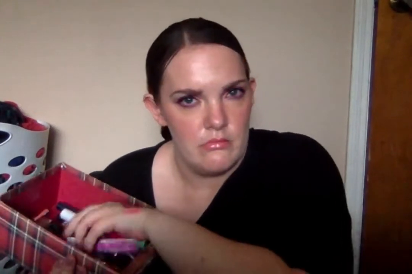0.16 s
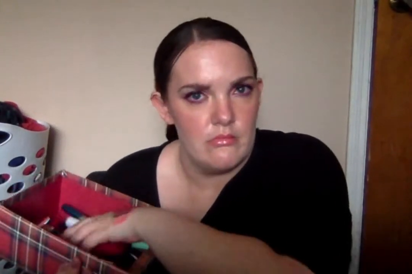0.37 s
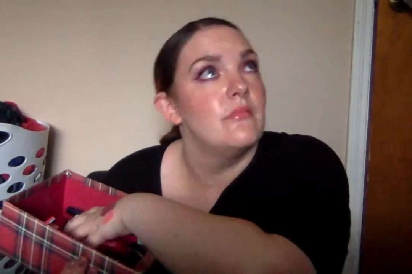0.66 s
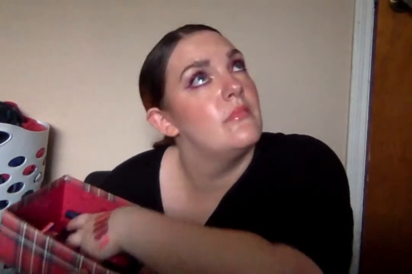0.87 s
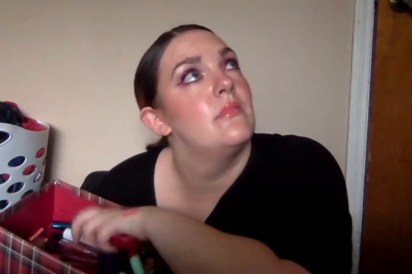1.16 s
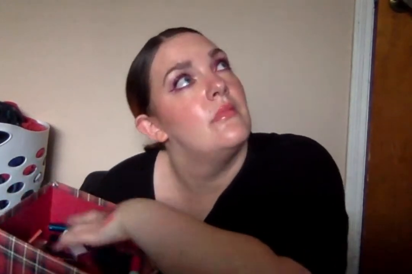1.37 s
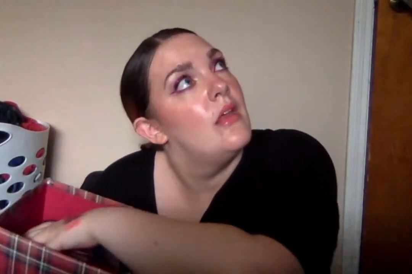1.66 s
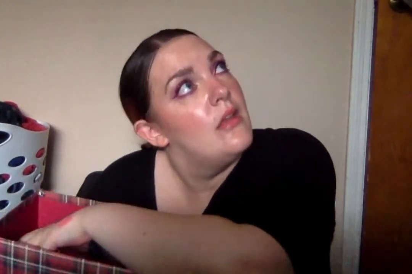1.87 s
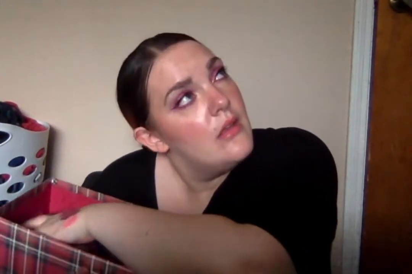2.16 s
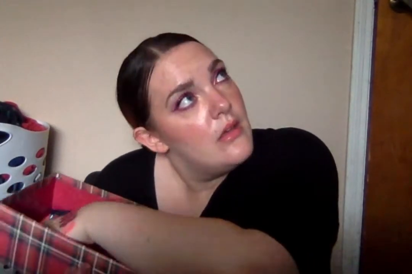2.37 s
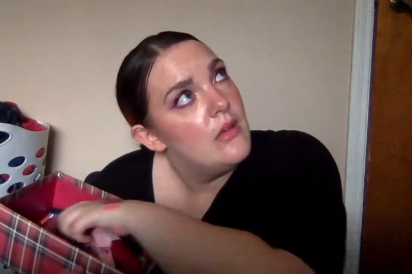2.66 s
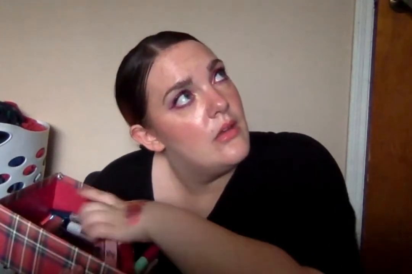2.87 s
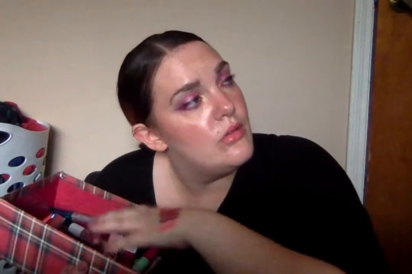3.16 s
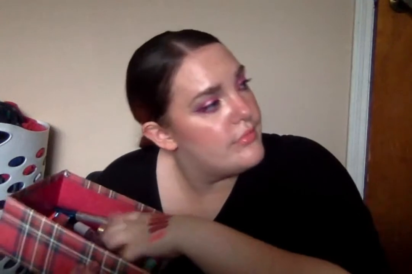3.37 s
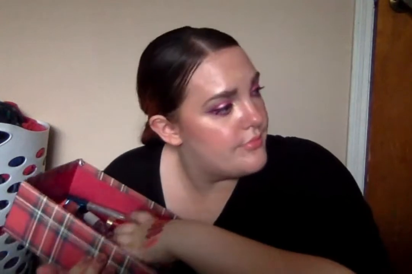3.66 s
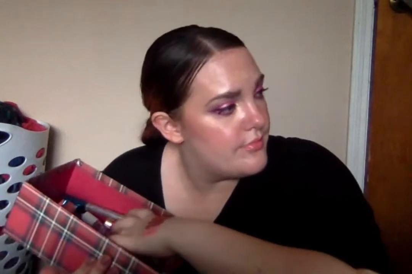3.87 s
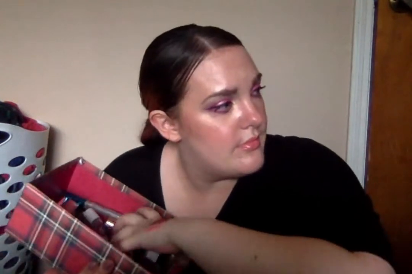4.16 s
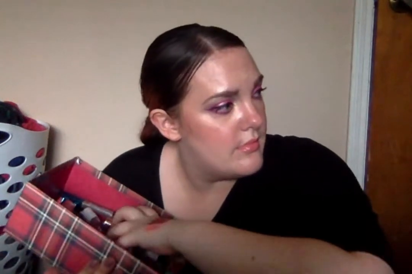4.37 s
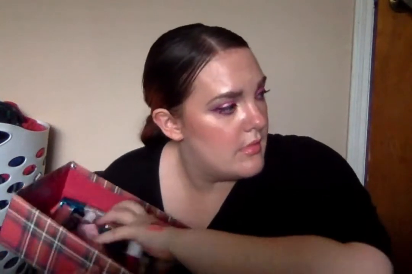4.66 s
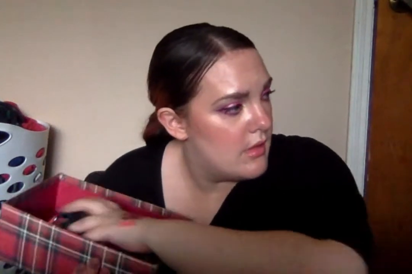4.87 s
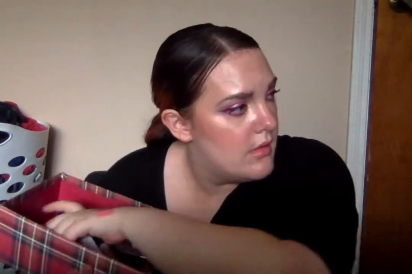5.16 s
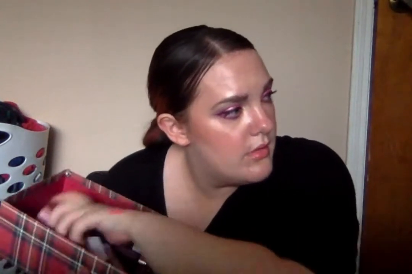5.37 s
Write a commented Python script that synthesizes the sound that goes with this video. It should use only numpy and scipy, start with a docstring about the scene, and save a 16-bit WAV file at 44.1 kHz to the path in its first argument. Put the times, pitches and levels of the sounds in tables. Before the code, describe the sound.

Plastic lipstick tubes click, knock and rattle as a hand rummages through a cardboard box in a small room.

```python
"""A hand rummages through plastic lipstick tubes in a cardboard box, in a small bare room.
From the start tubes knock on the box and click together, sliding and rattling between the blows.
A louder flurry after one second thins to light taps on hollow caps near two. The digging resumes,
the box bumping softly as it is shifted, eases just after four seconds and ends in a dense clatter.
The walls throw the clatter back, and a quiet hiss lies under it all."""
import sys
import numpy as np
from scipy import signal
from scipy.io import wavfile
from scipy.ndimage import uniform_filter1d

SR = 44100
rng = np.random.default_rng(int(sys.argv[2]) if len(sys.argv) > 2 else 0)


def wav_record(signal):
    """Record a signal, one row per channel, as 16-bit PCM in the file named by sys.argv[1]."""
    frames = np.transpose(np.atleast_2d(signal))
    bounded = np.clip(frames, -1, 1)
    # unit amplitude maps onto the largest positive 16-bit level
    quanta = np.round(bounded * 32767).astype(np.int16)
    wavfile.write(sys.argv[1], SR, quanta)


N = 243564

# a tube strikes the box: t/s, level/dB, then its tone: hollow thud/dB, woody knock/dB, hard clack/dB
KNOCKS = [(0.06, -33, -8, 5.5, 8), (0.07, -37, -15, -23, 16), (0.137, -37, -10, -17, 0.5),
          (0.174, -32.5, -13.5, -2, -16), (0.275, -36.5, -25, -30, -10), (0.295, -29.5, -16, -7, -11),
          (0.319, -26.5, -6, -1.5, 3.5), (0.485, -43.5, -52, 15.5, -2), (0.674, -37.5, -14.5, -2.5, -17),
          (0.797, -30, -6.5, 2, -5), (0.824, -29, -19.5, -8, 6), (1.05, -20.5, -10.5, -8, -5),
          (1.116, -17, -27, -10.5, -6.5), (1.129, -26.5, 1, 4, -21), (1.166, -19.5, -12, -10.5, -6),
          (1.237, -26.5, -41, -29, -14), (1.267, -30, -19, -29, -11), (1.326, -29.5, -11.5, -8, -12),
          (1.413, -22.5, -18, -8, -12.5), (1.426, -26, -5, -18, -7.5), (1.508, -30, -38, -16, -27),
          (1.54, -29, -20, -21, -30), (1.562, -31, -30, -10, -24), (1.628, -48, -38.5, -22, -28),
          (2.116, -37.5, -23, -31.5, -44), (2.184, -24.5, -21, -56, -5), (2.241, -27, -30, -37, -9.5),
          (2.305, -26, -14, -8, -13), (2.323, -40, -25.5, -32, 4), (2.48, -19.5, -16.5, -3.5, -15),
          (2.588, -18.5, -20, -11.5, -15), (2.615, -27, -36, -20, -28), (2.766, -26, -54, -33, -14),
          (2.774, -20, -6.5, -17, -13.5), (2.881, -31, -22, -19, -8), (2.94, -28.5, -7, -15, -8),
          (3.021, -18, -18.5, -11, -12.5), (3.07, -29.5, -11.5, -6, -1.5), (3.245, -62, -44, -16, -17),
          (3.356, -40, -17.5, -28, -24), (3.437, -18.5, -27.5, -7, -12), (3.61, -40, -35, -6, -18),
          (3.685, -34.5, -28, -15, -45), (3.733, -28, -46, -7, -11.5), (3.802, -26, -15.5, -13, -12.5),
          (3.901, -28.5, -32, -7, -23), (3.983, -30.5, -36, 5, -10.5), (4.039, -33, -17.5, 4, -7.5),
          (4.228, -49.5, -23, -12, -14), (4.26, -52.5, -9, 5, -1.5), (4.518, -39.5, -24, -12, -56),
          (4.661, -33.5, -11, 2.5, 1), (4.761, -30, -12.5, 1, -31), (4.815, -22, -23, -10, -8),
          (4.857, -19, -16.5, -10, -10.5), (4.951, -22, -13, -7, -1.5), (4.99, -19.5, -16, 3, -13),
          (5.001, -27, -18, 9, 9), (5.032, -19, -16.5, -16, -28), (5.181, -32, -23, -18, -39),
          (5.202, -30, -42, -20, -30), (5.232, -28, -38, -1, -28), (5.401, -18.5, -14, -6, -14.5),
          (5.434, -27, -8.5, -7, -42), (5.457, -17, -8.5, -11, -11), (5.515, -24.5, -11, -10, -4)]
# tube meets tube: t/s, level/dB, ring f/Hz, bright snap/dB (relative to the level)
CLICKS = [(0.06, -41, 3600, -35), (0.0683, -33, 3270, -21.5), (0.295, -39, 2900, -35),
          (0.3184, -29.5, 2540, -24.5), (0.327, -33, 3250, -22), (0.3867, -36, 3100, -15),
          (0.524, -55, 8200, -20), (0.566, -40.5, 4140, -21), (0.572, -71, 4580, -13),
          (0.6587, -49.5, 3130, -17), (0.666, -48, 5560, -25), (0.8113, -35.5, 4240, -15),
          (0.821, -28, 4380, -15), (0.9234, -35.5, 6580, -17), (0.9802, -31, 3870, -15),
          (0.99, -34.5, 3370, -22), (1.053, -33.5, 2670, -16), (1.1184, -41, 3000, -34),
          (1.1691, -27, 2520, -17), (1.265, -35, 3550, -27), (1.3652, -33, 3680, -51.5),
          (1.4142, -39.5, 3100, -28), (1.465, -40, 5900, -23), (1.69, -59, 3520, -18),
          (2.134, -55, 3600, -49), (2.184, -35.5, 4380, -16.5), (2.3017, -42.5, 3080, -47),
          (2.346, -46.5, 2800, -14), (2.4435, -37.5, 4070, -30), (2.4882, -36.5, 2580, -11.5),
          (2.584, -46, 3070, -41), (2.663, -35, 4170, -58), (2.7834, -39, 3940, -25),
          (2.7974, -38.5, 6730, -12), (2.8503, -43.5, 4000, -37), (2.927, -37.5, 3020, -25),
          (2.972, -35, 4400, -24), (3.058, -39.5, 4300, -16), (3.073, -36, 3000, -16),
          (3.4005, -41.5, 4100, -38), (3.4363, -37, 3880, -13), (3.5835, -45, 3170, -12.5),
          (3.7298, -32, 3270, -15), (3.7416, -32.5, 3960, -26), (3.983, -51, 6700, -25),
          (4.023, -55, 4400, -11), (4.318, -54, 3700, -29), (4.319, -58, 5400, -34),
          (4.4085, -58, 4000, -34), (4.416, -57.5, 2440, -40), (4.6022, -41, 4270, -26),
          (4.6656, -41, 4200, -22), (4.698, -33.5, 7400, -11), (4.7083, -28.5, 7400, -18),
          (4.802, -28.5, 3540, -18), (4.8553, -42, 2880, 2.5), (4.9516, -52, 2800, -13),
          (4.99, -32.5, 3600, -7), (4.998, -29.5, 2850, -9.5), (5.1415, -49, 3630, -38),
          (5.2626, -31, 2760, -22), (5.2689, -38, 4700, -44), (5.456, -38.5, 2800, -40),
          (5.4823, -40, 3350, -13.5)]
# the hand pushes through the tubes: t/s, length/s, sliding/dB, jostling/dB, scratching/dB
STROKES = [(0.0, 0.2, -34, -54, -71), (0.299, 0.11, -28.5, -39, -66), (0.438, 0.16, -44, -85, -96),
           (0.68, 0.046, -53.5, -76, -84), (0.764, 0.034, -43.5, -52, -77),
           (0.79, 0.061, -21.5, -38.5, -55), (0.846, 0.21, -46, -40, -59), (1.009, 0.28, -26, -41, -58.5),
           (1.199, 0.2, -29, -46.5, -76), (1.409, 0.048, -25, -46, -58), (1.494, 0.068, -43.5, -50, -66.5),
           (1.602, 0.17, -53, -63, -81), (1.903, 0.022, -55, -67, -96), (2, 0.075, -52, -68, -98),
           (2.132, .14, -29.5, -44.5, -91), (2.291, 0.083, -26.5, -47.5, -76), (2.4, 0.14, -34, -48.5, -86),
           (2.512, 0.1, -30.5, -71, -90), (2.675, 0.23, -37, -60, -84), (2.746, 0.1, -30, -41.5, -64),
           (2.855, 0.5, -35, -62, -81), (2.994, 0.092, -26.5, -40, -60), (3.095, .06, -37, -64, -90),
           (3.235, .045, -53, -72, -95), (3.359, 0.045, -36, -58, -85), (3.404, 0.082, -34.5, -43.5, -54),
           (3.52, 0.043, -42.5, -59, -71), (3.716, 0.068, -48, -60, -52.5), (3.769, 0.054, -33, -47.5, -71),
           (3.889, 0.032, -30, -56, -80), (4.004, 0.048, -30.5, -76, -88), (4.309, 0.035, -39, -79, -90),
           (4.503, 0.065, -64, -91, -99), (4.577, 0.088, -33.5, -52, -92), (4.65, 0.14, -26, -34, -49.5),
           (4.789, 0.11, -24, -36, -49), (4.89, 0.047, -32, -44.5, -62), (4.953, 0.12, -24.5, -37, -50.5),
           (5.104, 0.23, -35.5, -68, -76), (5.351, 0.082, -37, -71, -91), (5.478, .06, -28.5, -48, -68)]
STIR_ATTACK_S = 0.005  # rise of the skid, rattle or graze that follows a blow


def amp(db):
    """Decibels to gain."""
    return 10 ** (np.asarray(db) / 20)


def unit(x):
    """Scales to rms 1."""
    return x / np.sqrt(np.mean(x ** 2) + 1e-20)


def struck(x):
    """Scales a blow to rms 1 over its first 10 ms."""
    return x / np.sqrt(np.mean(x[:SR // 100] ** 2) + 1e-20)


def curve_at(points, hz):
    """Reads a curve on a log-frequency axis."""
    f, value = np.transpose(points)
    return np.interp(np.log(hz + 1), np.log(f + 1), value)


def add(mix, s, sound):
    """Mixes a sound in at time s."""
    part = mix[max(round(s * SR), 0):][:len(sound)]
    part += sound[:len(part)]


def band(x, lo_hz, hi_hz, order=3):
    """Causal band-pass."""
    return signal.sosfilt(signal.butter(order, [lo_hz, hi_hz], "band", fs=SR, output="sos"), x)


def colour(x, spectrum, size=2048):
    """Minimum-phase EQ from rows (f/Hz, level/dB), so attacks stay sharp."""
    log_gain = np.log(amp(curve_at(spectrum, abs(np.fft.fftfreq(size, 1 / SR)))))
    taps = np.fft.ifft(np.exp(np.conj(signal.hilbert(log_gain)))).real
    return signal.oaconvolve(x, taps)[:len(x)]


def swells(rows, attack_s, release_s, sag_db_per_s=0):
    """Envelope from rows (t/s, hold/s, level/dB): each rises, holds, and falls 60 dB in release_s."""
    power = np.zeros(N)
    for s, hold, db in rows:
        t = np.arange(0, hold + release_s, 1 / SR)
        fall_db = sag_db_per_s * t + 60 * np.maximum(t - hold, 0) / release_s
        add(power, s, (np.minimum(t / attack_s, 1) * amp(db - fall_db)) ** 2)
    return np.sqrt(power)


def pushes(levels_db):
    """Envelope of the hand's strokes: each push fades as the load gives way."""
    rows = [(s, length, db) for (s, length, *_), db in zip(STROKES, levels_db)]
    return swells(rows, attack_s=0.0059, release_s=0.041, sag_db_per_s=31.5)


def contacts(ring, spread_db, count):
    """A grain stream: sets a ring going at random moments, with uneven strength."""
    out = np.zeros(N)
    for when, strength, side in rng.random((count, 3)):
        add(out, when * N / SR, amp(spread_db * strength) * np.sign(side - .5) * ring)
    return out


def steadied(x, size=2000):
    """Takes the slow swell out of a texture and leaves its grain."""
    return x / np.sqrt(abs(uniform_filter1d(x ** 2, size)) + np.mean(x ** 2) / 20)


def dispersed(x, width_hz=170):
    """Bending waves in cardboard travel at different speeds, smearing a push over a few milliseconds."""
    radius = np.exp(-np.pi * width_hz / SR)
    for hz in (650, 950, 1300, 1750, 2300):
        poles = [1, -2 * radius * np.cos(2 * np.pi * hz / SR), radius * radius]
        x = signal.lfilter(poles[::-1], poles, x)  # all-pass
    return x


def box_ring(modes_db=0, crunch=0.98, crunch_s=0.0025, scatter_db=3.5, detune=0.028, size=3000):
    """One blow on the box: a sharp push, modes weighted by where it lands, and the loose load's jolt."""
    # modes of the box and its load: f/Hz, level/dB, t60/s
    modes = [(247, 9, 0.0092), (401, -8, 0.067), (436.5, 5.5, 0.015), (461, 8.5, 0.055), (606, -5, 0.071),
             (745.5, 8, 0.19), (795, -4.5, 0.17), (969, 2, 0.096), (1117, 0.5, 0.12), (1190, -4, 0.057),
             (1320, -4.5, 0.05), (1390, -10, 0.032), (1650, -1.5, 0.082), (1625, -6, 0.034),
             (1860, -15, 0.09), (1849, -8.5, 0.017), (2142, -3, 0.02), (2880, -11, 0.052)]
    t = np.arange(size) / SR
    hz, db, t60 = np.transpose(modes)[:, :, None]
    hz = hz * (1 + detune * rng.standard_normal(hz.shape))  # the shifting load retunes the box
    damping = np.log(1000) / t60
    weight = amp(db + modes_db + scatter_db * rng.standard_normal(hz.shape)) * 2 * damping / SR
    phase = rng.uniform(-1.6, 1, hz.shape)
    ring = (weight * np.exp(-damping * t) * np.cos(2 * np.pi * hz * t + phase)).sum(0)
    ring[0] += 1  # the push itself
    jolt = rng.standard_normal(size) * np.exp(-t / crunch_s)
    return ring + crunch * jolt / np.linalg.norm(jolt)


def plastic_partials(hz, size, decay_s):
    """One row per partial: a quick swell that dies within a few milliseconds."""
    t = np.arange(size) / SR
    rise = 1 - np.exp(-t / .0005)
    return np.sin(2 * np.pi * hz[:, None] * t) * rise * np.exp(-t / decay_s)


def tube_ring(hz, partial_db, crack_db, ring_s, crack_s=0.0032, size=1200):
    """A plastic tube: a crack, a well-damped main ring, and weaker partials set by the contact."""
    # tone of the crack: f/Hz, level/dB
    crack_eq = [(400, 4), (1500, 9), (2600, 14), (4500, 18), (6000, 5), (8000, -21.5), (11000, -9.5),
                (15000, -18)]
    t = np.arange(size) / SR
    side_hz = rng.uniform([2400, 3400, 5200, 6200], [3400, 5000, 6400, 8200])
    side_gains = amp(partial_db * rng.uniform(0.11, 1.72, len(side_hz)))
    ring = np.append(1, side_gains) @ plastic_partials(np.append(hz, side_hz), size, ring_s)
    crack = colour(rng.standard_normal(size) * np.exp(-t / crack_s), crack_eq)
    return struck(ring) + amp(crack_db) * struck(crack)


def scuffed(ring, scuff_db, lead_s, settle_db=-15, settle_s=0.0051, size=1500, count=40):
    """A tube grazes its neighbours as it lands, then rebounds. Returns the pre-roll (s) and the sound."""
    offsets = rng.integers(-size, size, count)
    grazes = amp(scuff_db) * np.exp(-abs(offsets) / SR / lead_s)
    rebounds = amp(settle_db) * np.exp(-abs(offsets) / SR / settle_s)
    touches = np.zeros(2 * size)
    touches[offsets + size] = np.where(offsets < 0, grazes, rebounds) * rng.standard_normal(count)
    touches[size] = 1  # the main hit
    return size / SR, signal.fftconvolve(touches, ring)


def room_tone(level_db=-70):
    """A quiet bed of hiss with a thin whine."""
    # tone of the bed, the whine a narrow peak at 11.6 kHz: f/Hz, level/dB
    hiss_eq = [(25, -10.5), (60, -0.5), (130, 6), (400, -1), (1000, -12), (2500, -13), (5000, -22.5),
               (9000, -25), (11400, -30), (11600, -16), (11800, -38), (16000, -48)]
    return amp(level_db) * unit(colour(rng.standard_normal(N), hiss_eq))


def room_tail(predelay_s=0.0042, size=20000):
    """Diffuse reverb, each band dying at its own speed."""
    # decay of the room: f/Hz, t60/s
    decay_times = [(150, 0.36), (500, 0.29), (1400, 0.27), (3700, 0.23), (9000, 0.18), (15000, 0.17)]
    # tone of the reverb; the box shades the direct treble, so treble is wetter: f/Hz, level/dB
    wet_eq = [(150, -5.5), (400, -11), (1000, -1), (3000, 2), (12000, 4.5)]
    hz, t, noise = signal.stft(rng.standard_normal(size), SR, nperseg=256)
    t60 = curve_at(decay_times, hz)[:, None]
    start_gain = amp(curve_at(wet_eq, hz))[:, None] * np.sqrt(2 * np.log(1000) / (t60 * SR))
    wash = signal.istft(noise * start_gain * amp(-60 * t / t60), SR, nperseg=256)[1]
    fade_in = np.clip(np.arange(len(wash)) / SR / predelay_s - 1, 0, 1)
    return wash * fade_in


def room(x, echo_db, wet_db, spot_s=0.13, spots=7):
    """Near walls answer first; the tail changes as the sound moves from spot to spot in the box."""
    # early reflections: delay/s, relative gain
    echoes = [(.0013, .35), (.0036, -.22), (.0083, .6), (.0092, -.25), (.0117, .42), (.0142, .25)]
    out, t = x.copy(), np.arange(N) / SR
    for delay, gain in echoes:
        add(out, delay, amp(echo_db) * gain * x)
    for spot in range(spots):
        crossfade = np.sin(np.pi / 2 * np.minimum((t / spot_s + spot) % spots, 2))
        out += amp(wet_db) * signal.oaconvolve(x * crossfade, room_tail())[:N]
    return out


def box_shifting(level_db=-4, rock_db=-31, hold_s=0.013):
    """Dull bumps of the box on its support, and its slight rocking under every push."""
    # the box bumps: t/s, level/dB
    bumps = [(0.305, -47), (0.8, -48), (1.11, -49), (2.18, -49.5), (2.37, -45), (2.409, -38), (2.58, -51),
             (2.775, -44.5), (2.85, -43), (2.9, -37.5), (3.018, -38), (3.681, -48), (4.11, -59),
             (4.23, -60), (4.31, -63), (4.86, -51), (5.02, -52)]
    _, _, slide_db, _, _ = np.transpose(STROKES)
    jolts = swells([(s, hold_s, db) for s, db in bumps], attack_s=0.0042, release_s=0.18)
    rumble_eq = [(15, -27), (35, -14.5), (65, -6.0), (120, 3.5), (180, -0.5), (400, -50.5)]
    rumble = steadied(colour(rng.standard_normal(N), rumble_eq), size=3000)
    return rumble * amp(level_db) * np.hypot(jolts, pushes(slide_db + rock_db))


def edge_scratching(level_db=-5, graze_db=-4):
    """Hard edges catch and let go, under the hand and after each snap: a fine, bright crackle."""
    _, _, _, _, scratch_db = np.transpose(STROKES)
    graze_cues = [(s, 0, db + snap + graze_db) for s, db, _, snap in CLICKS]
    grazes = swells(graze_cues, STIR_ATTACK_S, release_s=0.091)
    grains = plastic_partials(np.geomspace(7400, 15400, 24), size=500, decay_s=.0005)
    crackle = sum(contacts(grain, spread_db=25, count=110) for grain in grains)
    return steadied(crackle) * amp(level_db) * np.hypot(grazes, pushes(scratch_db))


def tube_jostling(level_db=-8, rattle_db=-2):
    """Tubes of many sizes chatter against their neighbours, under the hand and after each click."""
    _, _, _, jostle_db, _ = np.transpose(STROKES)
    rattles = swells([(s, 0, db + rattle_db) for s, db, *_ in CLICKS], STIR_ATTACK_S, release_s=0.12)
    rings = [tube_ring(hz, partial_db=-14.5, crack_db=0.5, ring_s=0.0012) * (3000 / hz) ** 3
             for hz in np.geomspace(2400, 11000, 36)]
    chatter = sum(contacts(ring, spread_db=33, count=100) for ring in rings)
    return steadied(band(chatter, 1000, 12000)) * amp(level_db) * np.hypot(rattles, pushes(jostle_db))


def tube_sliding(level_db=-9, skid_db=-7):
    """Tubes stick and slip on the box, pushed by the hand or skidding after a knock: many tiny blows."""
    # tone of plastic rubbing on cardboard: f/Hz, level/dB
    slide_eq = [(80, -41.5), (170, -13.5), (260, -14), (420, 8.5), (580, 1.5), (800, 8.5), (1300, 4.5),
                (2000, 0.5), (2800, -13), (4500, -14.5), (9000, -71.5)]
    _, _, slide_db, _, _ = np.transpose(STROKES)
    skids = swells([(s, 0, db + skid_db) for s, db, *_ in KNOCKS], STIR_ATTACK_S, release_s=0.16)
    grains = (box_ring(modes_db=3.5, crunch=0.42) for _ in range(12))
    slips = sum(contacts(grain, spread_db=22.5, count=130) for grain in grains)
    friction = steadied(colour(dispersed(slips), slide_eq))
    return friction * amp(level_db) * np.hypot(skids, pushes(slide_db))


def cap_taps(level_db=-8, t60_s=0.04, chatter=0.047, chatter_s=0.0014, size=3000):
    """A hollow cap answers a light, chattering tap with one short note."""
    # taps on the caps: t/s, level/dB, f/Hz
    taps = [(1.9154, -57, 1970), (1.938, -49, 1620), (2.0058, -42.5, 1097), (2.007, -52, 2580),
            (2.1043, -47.5, 3320), (3.1423, -41, 2280), (3.156, -52, 2580), (3.6972, -34.5, 964),
            (4.3135, -40, 1985), (4.322, -35.5, 1720), (4.577, -48.5, 1490)]
    out, t = np.zeros(N), np.arange(size) / SR
    for s, db, hz in taps:
        tap = chatter * rng.standard_normal(size) * np.exp(-t / chatter_s)
        tap[0] = 1
        ring = np.sin(2 * np.pi * hz * t) * amp(-60 * t / t60_s)
        note = signal.fftconvolve(tap, ring)[:size]
        add(out, s, amp(db + level_db) * struck(band(note, hz / 2, hz * 2, order=2)))
    return out


def tube_clicks(ring_db=-8, snap_db=-4):
    """Each contact rings a tube; the hardest also wake its highest partials in a bright snap."""
    out = np.zeros(N)
    for s, db, hz, snap in CLICKS:
        ring = band(tube_ring(hz, partial_db=-12, crack_db=-12, ring_s=.0017), 1800, 8000)
        top_hz = rng.uniform([8000, 9200, 10200, 11500, 13000, 14200],
                             [9200, 10200, 11300, 13000, 14200, 15500])
        top = amp([0, -1, -2, -7, -5, -6]) @ plastic_partials(top_hz, size=1200, decay_s=0.0019)
        click = amp(ring_db) * struck(ring) + amp(snap + snap_db) * struck(top)
        preroll_s, click = scuffed(click, scuff_db=-23.5, lead_s=0.0063)
        add(out, s - preroll_s, amp(db) * click)
    return out


def box_knocks(level_db=-6, thud_db=10, wood_db=3):
    """Tubes strike the cardboard: heavy flat blows bring out the thud, hard edges the clack."""
    out = np.zeros(N)
    for s, db, thud, wood, clack in KNOCKS:
        low, mid = thud + thud_db, wood + wood_db
        blow_eq = [(60, low - 31), (160, low - 15), (250, low), (380, 0.88), (520, -2.2), (1000, mid),
                   (2000, clack), (2500, clack - 5), (3100, clack - 14), (5000, clack - 32),
                   (12000, clack - 58)]
        blow = colour(dispersed(box_ring()), blow_eq)
        body = band(blow, 320, 1000)[:SR // 100]  # the midrange of the attack sets the level
        blow /= np.sqrt(np.mean(body ** 2))
        preroll_s, blow = scuffed(blow, scuff_db=-27.5, lead_s=0.023)
        add(out, s - preroll_s, amp(db + level_db) * blow)
    return out


def scene():
    """Cardboard, tubes and edges each get their own room send; the bumps and the hiss stay dry."""
    hiss = room_tone()
    cardboard = room(box_knocks() + tube_sliding(), echo_db=-8.5, wet_db=4)
    tubes = room(tube_clicks() + cap_taps() + tube_jostling(), echo_db=-3.5, wet_db=-2)
    edges = room(edge_scratching(), echo_db=1.5, wet_db=-12)
    return (cardboard + tubes + edges + box_shifting() + hiss)[None]


def record(dry):
    """A steep high cut at 16 kHz."""
    high_cut = signal.firwin(255, 16000, window=("kaiser", 8), fs=SR)
    return signal.oaconvolve(dry, high_cut[None], "same")


dry = scene()
out = record(dry)
wav_record(out)
```